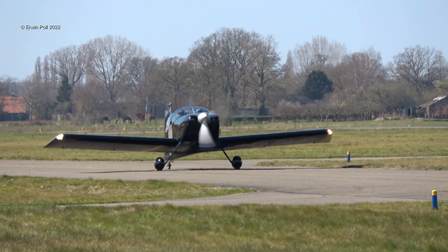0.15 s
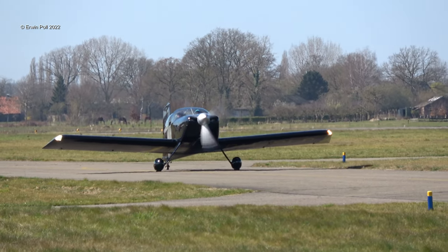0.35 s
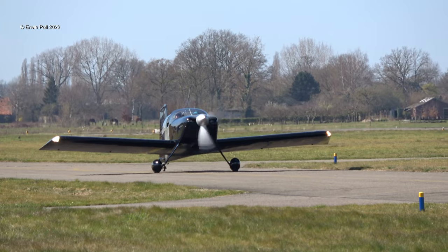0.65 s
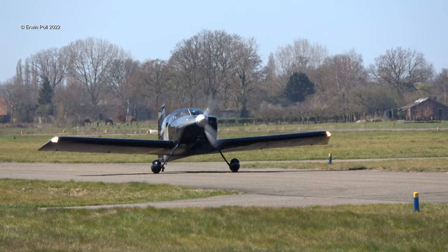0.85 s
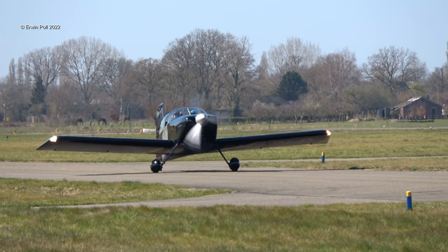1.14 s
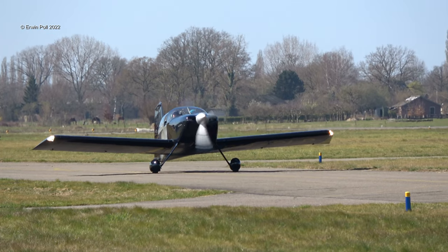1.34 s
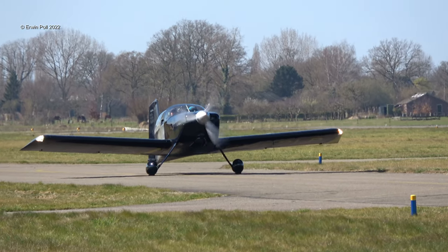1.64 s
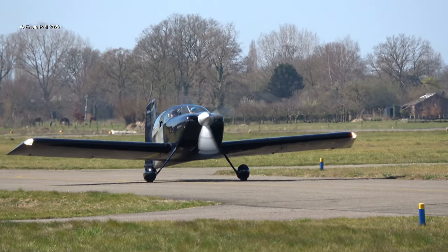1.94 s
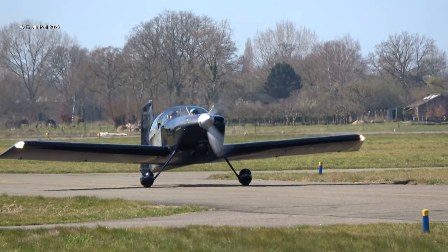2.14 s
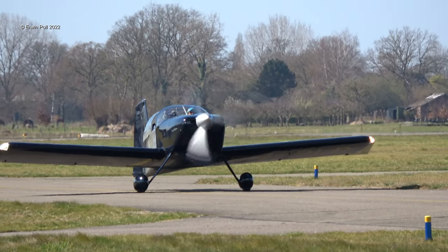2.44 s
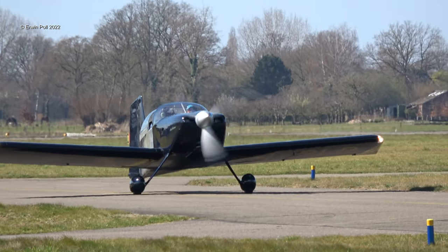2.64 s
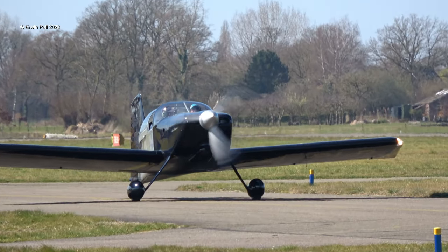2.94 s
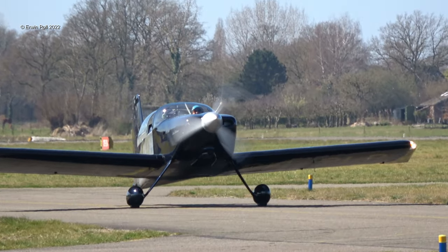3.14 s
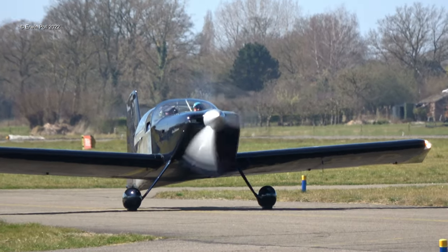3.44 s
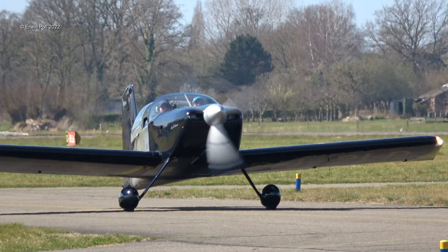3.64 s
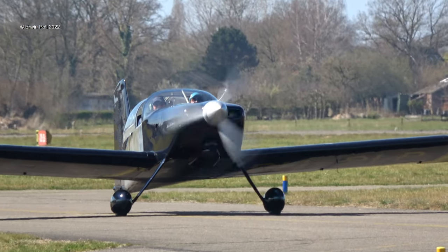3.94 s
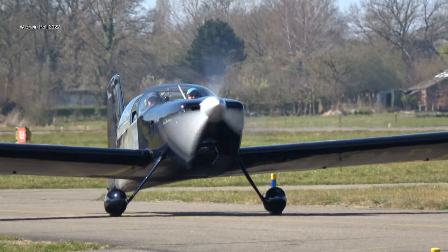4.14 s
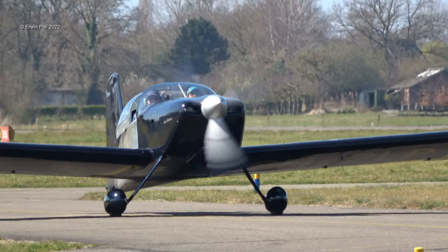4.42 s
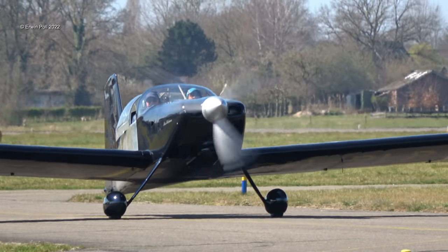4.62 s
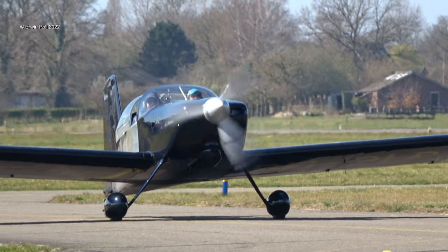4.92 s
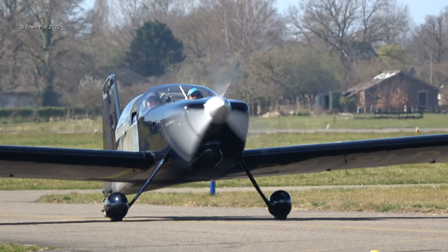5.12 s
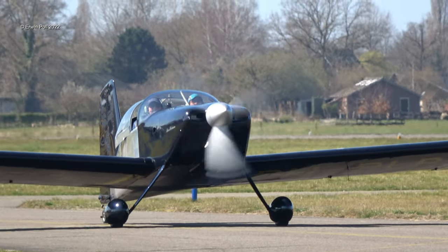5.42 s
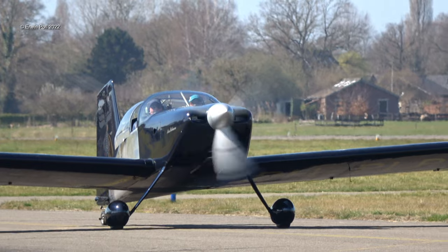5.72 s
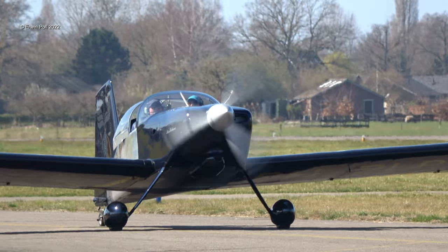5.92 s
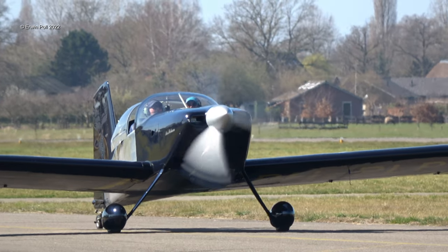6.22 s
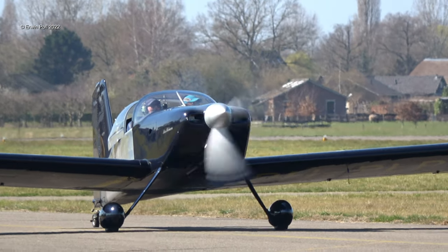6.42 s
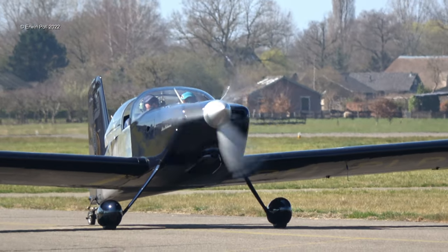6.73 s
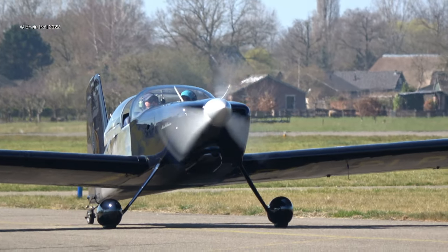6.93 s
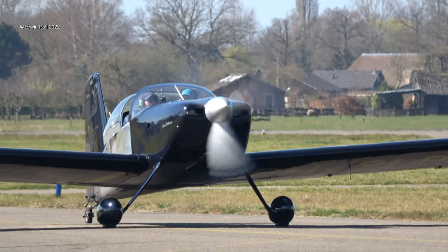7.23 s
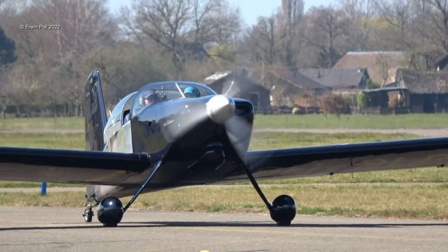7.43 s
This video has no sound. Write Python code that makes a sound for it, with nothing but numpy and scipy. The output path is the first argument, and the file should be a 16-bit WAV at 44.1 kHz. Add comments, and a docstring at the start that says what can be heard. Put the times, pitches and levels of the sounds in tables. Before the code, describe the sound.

Outdoors on a grassy airfield, an idling four-cylinder propeller plane rolls nearer. Its low hum pulses with lumpy firing and metallic rattle, while a faraway engine adds a slowly beating buzz. After about a second something small clicks close to the microphone. The nearer engine then gains body, boom, hiss and sputtering, with brief rough flares and a breathy howl, over mild wind rumble. There is no reverberation.

```python
"""A propeller drones over an exhaust that thuds and spits and a cowling that clatters: a light aircraft,
its four-cylinder engine idling, taxies over open grass toward the microphone from 58.5 m away.
One shaft phase times the drone and the four uneven firings; filtered noise makes gas, air and rattle.
Far off, a faster engine hums and buzzes in overtones that beat with the near exhaust.
A light wind rumbles on the microphone, and something small and hard clicks once close by."""
import sys
import numpy as np
from scipy import signal
from scipy.fft import rfft, irfft, next_fast_len
from scipy.io import wavfile
from scipy.ndimage import uniform_filter1d, minimum_filter1d, map_coordinates

SR = 44100
rng = np.random.default_rng(int(sys.argv[2]) if len(sys.argv) > 2 else 0)


def file_out(sig):
    """Save sig as 16-bit WAV at sys.argv[1]."""
    # one column per channel
    cols = np.atleast_2d(sig).T
    # limit, then scale
    lim = np.clip(cols, -1, 1)
    pcm = np.round(lim * 32767).astype(np.int16)
    wavfile.write(sys.argv[1], SR, pcm)


N = 333837

# The cylinders in firing order. Each row: place in the engine cycle (0-1), thud in dB, spit in dB.
CYLINDER_FIRINGS = [(.135, -2, -4.5), (0.388, -6, -7), (0.649, -8.5, -4), (0.859, 0.5, -20)]
# Steady exhaust tones. Each row: multiple of the engine cycle rate, relative level in dB.
EXHAUST_TONES = [(9, 1), (10, -12), (12, -3.5), (13, 0), (15, -5.5), (16, -6), (17, -14.5), (20, -16),
                 (21, -15), (24, -12.5), (25, -17), (28, -15), (29, -20.5), (37, -28.5), (46, -26.5),
                 (54, -26.5)]
# Colour of the exhaust pipe. Each row: frequency in Hz, gain in dB.
PIPE_COLOUR = [(12, -22), (25, -4), (42, -0.5), (60, -16), (85, 4.5), (115, -1.5), (140, -5), (175, -14),
               (197, -16), (240, -26), (400, -28.5), (700, -33), (2000, -79), (6000, -120)]
# Colour of the valve clatter. Each row: frequency in Hz, relative density in dB per Hz.
CLATTER_COLOUR = [(400, -25.5), (900, -4), (1150, 0), (1450, -1), (1900, -2), (2500, -5.5), (3200, -12),
                  (4200, -21), (6000, -33.5), (10000, -81.5)]
# Colour of the spitting gas. Each row: frequency in Hz, relative density in dB per Hz.
SPIT_COLOUR = [(900, -25), (2000, -2.5), (3300, 5), (4600, 3.5), (6500, -6.5), (8400, -7.5), (10000, -20),
               (11050, -31.5), (11900, -23), (14000, -16), (16000, -27.5)]
# Colour of the wind on the microphone. Each row: frequency in Hz, relative density in dB per Hz.
WIND_SPECTRUM = [(3, -33.5), (7, -4), (10, 8.5), (17, -3), (25, 1.5), (42, -15), (100, -29.5), (300, -63.5),
                 (1000, -120)]
# Ringing cowling panels. Each row: centre in Hz, width in Hz, relative level in dB.
PANEL_RESONANCES = [(1338, 210, -2), (1466, 150, -1.5), (1664, 190, -4.5), (2160, 490, -4.5),
                    (2753, 150, -11.5)]
# The hardest exhaust spits. Each row: start in seconds, approximate peak in dB.
HARD_SPITS = [(1.377, -46), (2.805, -45), (3.613, -44), (3.8536, -40.5), (3.997, -43.5), (4.107, -44.5),
              (4.25, -43), (5.009, -44), (5.267, -55), (5.4835, -49.5), (5.552, -37), (5.697, -42),
              (5.8414, -50), (5.987, -39.5), (6.0242, -46), (6.141, -40.5), (6.277, -44), (6.424, -42.5),
              (6.567, -44), (6.748, -41.5), (6.8927, -35.5), (7.0354, -35.5), (7.144, -43), (7.431, -45),
              (7.468, -41)]
# Speed of the distant engine. Each row: time in seconds, firing rate in Hz.
FAR_FIRING_RATE = [(0, 74.2), (1, 75.26), (2, 74.86), (2.6, 75.78), (3.1, 74.9), (3.6, 74.11), (4.4, 74.63),
                   (5, 75.2), (5.8, 75.02), (6.5, 74.77), (7.57, 74.34)]
# Overtones of the distant engine. Each row: frequency in Hz, relative level in dB.
FAR_OVERTONES = [(150, 12), (226, -3.5), (300, -1), (376, -4), (450, -5), (527, -3.5), (600, -5), (680, -5),
                 (753, -3), (830, -3.5), (905, -5), (980, -9.5), (1150, -17), (1600, -10), (2400, -24),
                 (3000, -22)]
# The click close by. Each row: start in seconds, approximate peak in dB.
CLICK_EVENTS = [(0.8862, -7.5)]
# Ringing of the small hard part. Each row: frequency in Hz, relative level in dB, 60 dB decay in seconds.
CLICK_RINGING = [(560, -8, 0.077), (660, -5, 0.035), (787, -9, 0.059), (947, -7, 0.052), (1180, -24, 0.025),
                 (1450, -14, .025), (1864, -5, 0.02), (2640, -5, 0.017), (2820, -4.5, 0.019),
                 (3440, -14.5, 0.0081), (3850, -17.5, 0.018), (4740, -26.5, 0.017), (5496, -21, 0.014),
                 (6300, -12.5, 0.0088), (6756, -16, 0.015), (7250, -15, 0.0076)]
# Colour of the propeller's wash. Each row: frequency in Hz, relative density in dB per Hz.
WASH_COLOUR = [(120, -20.5), (245, -2), (330, -2), (450, 0), (650, 0), (850, -2.5), (1100, -8.5),
               (1600, -17), (3000, -45.5), (6000, -120)]
# Pitch of the propeller, which hunts and sags with the idling shaft. Each row: time in seconds, drone in Hz.
DRONE_PITCH = [(0.0, 54.36), (0.8, 54.17), (1.2, 55.37), (1.75, 55.19), (2.15, 52.75), (2.55, 56.12),
               (3.1, 55.1), (3.65, 54.84), (4.0, 55.82), (4.7, 55.46), (5.0, 54.21), (5.4, 55.79),
               (5.9, 54.77), (6.3, 55.52), (6.6, 55.2), (7.57, 55.74)]
# How strongly the drone arrives. Each row: time in seconds, level in dB.
DRONE_LEVEL = [(0, -18), (1.1, -16.5), (1.55, -14.5), (2.0, -13.5), (2.15, -15.5), (2.35, -13.5),
               (3.5, -12.5), (4.25, -11), (4.8, -11), (5.5, -9), (6.7, -12), (7.57, -9.5)]
# Level of the howl in the propeller's airflow. Each row: time in seconds, level in dB.
HOWL_STRENGTH = [(0, -51), (1.7, -51), (2.3, -43), (3.35, -43), (3.7, -55), (4.2, -40.5), (4.7, -43.5),
                 (5.5, -38), (6.3, -48.5), (6.9, -44), (7.57, -56)]
# Gusts on the microphone. Each row: centre in seconds, half-length in seconds, level in dB.
WIND_GUSTS = [(3.3, 0.13, -13), (4.15, 0.26, -18), (4.703, 0.26, -16), (5.496, 0.39, -18.5),
              (6.27, 0.11, -9.5)]
# Treble on top of the steady approach. Each row: time in seconds, gain in dB.
TREBLE_GAIN = [(0, -0.5), (1.9, 0), (2.6, 1), (3.4, 2.5), (4.0, 1.05), (4.9, 0.6), (5.55, 1), (6.5, 0),
               (7.57, 0.7)]
# The distant hum. Each row: time in seconds, level in dB before its small random wobble.
HUM_LEVEL = [(0, -17.5), (1, -13.5), (2.05, -23.5), (2.6, -16.5), (3.5, -25.5), (4.6, -15), (6, -30),
             (7.57, -23)]
# Passing swells of single distant overtones. Each row: centre in seconds, half-length in seconds,
# overtone in Hz, gain in dB.
BUZZ_SWELLS = [(.42, .25, 527, 5), (1.45, .42, 678, 6.5), (1.601, 1.1, 452, 6), (1.605, .22, 1055, 13.5),
               (1.917, 0.25, 527, 10.5), (2.796, 0.16, 527, 7), (2.851, 0.27, 603, 9), (3.247, .2, 450, 9),
               (3.1, .35, 980, 6.5), (6.001, 1.2, 375, 11.5)]
# Flares of the roar. Each row: centre in seconds, half-length in seconds, band in Hz, width in Hz,
# level in dB before the flutter.
ROAR_FLARES = [(1.55, 0.32, 1600, 149, -50.5), (2.4, .25, 1390, 160, -43.5), (3.352, .25, 1355, 220, -47),
               (4.15, .25, 1670, 90, -48), (4.816, .16, 1700, 150, -46), (5.503, 0.28, 1383, 280, -40),
               (6.154, 0.23, 1393, 180, -40), (7.45, .4, 2130, 790, -41.5)]

# The aircraft rolls straight in at a steady pace.
START_M, TAXI_M_PER_S = 58.5, 3.97
# Levels at the starting distance, before the treble curve; each gains as the aircraft nears.
CLATTER_DB, SPIT_DB, PANELS_DB = -44, -59, -54
# Grass and air swallow this much spitting treble over each metre.
SPIT_LOSS_DB_PER_M = 0.12
# Exhaust and wash at the drone's mean level, and the share of its dB swings that they follow.
THUD_DB, THUD_FOLLOWS = -26.5, 0.81
WASH_DB, WASH_FOLLOWS = -37, 0.22
# The low end of the wash fills out by this share of the dB gained in nearing.
WASH_LOW_HZ, WASH_FILL = 340, 0.91
# The howl climbs once and stays up.
HOWL_LOW_HZ, HOWL_HIGH_HZ, HOWL_CLIMBS_S, HOWL_CLIMB_S = 837, 929.6, 2.65, .2
# Engine bay boom against the drone; it opens only once the nose has come round.
BOOM_DB, BOOM_OPENS_S, BOOM_OPENING_S, BOOM_SHUT_DB = -37.5, 1.4, 0.85, -12.5
# The exhaust throb lies close in pitch to the distant hum; the two oppose each other at CANCEL_S.
THROB_ORDER, CANCEL_S = 11, 4.08
# Throb at idle speed and mean drone level; it grows as the labouring shaft sags.
THROB_DB, IDLE_HZ, THROB_DB_PER_HZ = -18.5, 54.7, 5
# The distant buzz swells in to BUZZ_DB, holds, then fades to a lower level.
BUZZ_DB, BUZZ_SWELLS_S, BUZZ_SWELLING_S, BUZZ_SWELL_DB = -33.5, 0.53, 0.13, 3.5
BUZZ_FADES_S, BUZZ_FADING_S, BUZZ_FADE_DB = 3.94, 0.5, -7
# The overtones that carry best drift upward and come to rest.
FOCUS_START_HZ, FOCUS_RISE_HZ_PER_S, FOCUS_END_HZ = 487, 150, 1010
BREEZE_DB = -27.5
TOP_HZ = 15750


def amp(db):
    """Decibels to gain."""
    return 10 ** (np.asarray(db) / 20)


def unit(x):
    """Scale to rms 1."""
    return x / np.sqrt(np.mean(x ** 2) + 1e-20)


def along(points, hz):
    """Read (Hz, value) points on a log frequency axis."""
    f, v = np.transpose(points)
    return np.interp(np.log(hz + 1), np.log(f + 1), v)


def curve(rows):
    """One value per sample from (seconds, value) rows."""
    s, values = np.transpose(rows)
    return np.interp(np.arange(N) / SR, s, values)


def wobble(rate):
    """A smooth random curve with rate knots a second."""
    return map_coordinates(rng.standard_normal(2048), [np.arange(N) * rate / SR + 2], mode="mirror")


def step(at_s, width_s):
    """A smooth change from 0 to 1 around a moment."""
    return .5 + .5 * np.tanh((np.arange(N) / SR - at_s) / (2 * width_s))


def swell(at_s, half_s):
    """A smooth rise to 1 and fall around a moment."""
    return np.exp(-((np.arange(N) / SR - at_s) / half_s) ** 2)


def filtered(x, response):
    """Multiply the spectrum of x by a response of frequency."""
    m = next_fast_len(N + SR // 2)
    return irfft(rfft(x, m) * response(np.fft.rfftfreq(m, 1 / SR)), m)[:N]


def noise(spectrum):
    """Coloured noise of rms 1."""
    return unit(filtered(rng.standard_normal(N), lambda hz: amp(along(spectrum, hz))))


def causal(spectrum, hz):
    """The minimum-phase response with this colour: it rings only after a blow."""
    cepstrum = irfft(np.log(amp(along(spectrum, hz))))
    half = len(cepstrum) // 2
    cepstrum[1:half] *= 2
    cepstrum[half + 1:] = 0
    return np.exp(rfft(cepstrum))


def resonant(centre_hz, width_hz):
    """Noise of rms 1 ringing in one resonance."""
    def response(f):
        peak = 1j * f * width_hz / (centre_hz ** 2 - f * f + 1j * f * width_hz)
        return peak ** 2
    return unit(filtered(rng.standard_normal(N), response))


def impulses(times, sizes):
    """A train of single blows."""
    samples = np.clip(np.round(times * SR).astype(int), 0, N)
    return np.bincount(samples, sizes, N + 1)[:N]


def puffs(blows, rise, t60):
    """Each blow opens a quick swell that dies away (both times in seconds)."""
    t = np.arange(SR // 4) / SR
    shape = (1 - np.exp(-t / rise)) * amp(-60 * t / t60)
    return signal.fftconvolve(blows, shape / shape.max())[:N]


def patchy(x, depth_db, across_hz, lasting_s):
    """Turbulence: short patches of the sound stand out or sink, each in its own band."""
    z = signal.stft(x, nperseg=256)[2]
    bands, frames = np.indices(z.shape)
    at = [bands * SR / 256 / across_hz, frames * 128 / SR / lasting_s]
    field = map_coordinates(rng.standard_normal((96, 1024)), at, order=1, mode="mirror")
    patches_db = depth_db * unit(np.tanh(2 * field))
    return unit(signal.istft(z * amp(patches_db), nperseg=256)[1][:N])


def engine_cycle():
    """Engine cycles done so far: the drone swings eight times in each."""
    return np.cumsum(curve(DRONE_PITCH)) / SR / 8


def approach():
    """Metres rolled so far, and the dB gained by being nearer (inverse distance)."""
    rolled_m = TAXI_M_PER_S * np.arange(N) / SR
    return rolled_m, 20 * np.log10(START_M / np.maximum(START_M - rolled_m, 1))


def propeller(cycle, drone_db, swell_db, near_db):
    """The blades beat the air into a pure drone, over churned wash and a howl."""
    drone = amp(drone_db) * np.sin(2 * np.pi * 8 * cycle)
    return drone + amp(WASH_DB + WASH_FOLLOWS * swell_db) * wash(near_db) + howl(width_hz=75)


def wash(near_db):
    """Air churned by the blades, fuller from near by."""
    air = noise(WASH_COLOUR)
    low = filtered(air, lambda hz: 1 / (1 + (hz / WASH_LOW_HZ) ** 8))
    fill = amp(WASH_FILL * (near_db - near_db.mean()))
    return (air - low + low * fill) * amp(0.47 * wobble(16))


def howl(width_hz):
    """A narrow, breathy noise band in the airflow that climbs in pitch, coming and going."""
    def band():
        return filtered(rng.standard_normal(N), lambda f: 1 / (1 + (f / width_hz) ** 2))
    hz = HOWL_LOW_HZ + (HOWL_HIGH_HZ - HOWL_LOW_HZ) * step(HOWL_CLIMBS_S, HOWL_CLIMB_S)
    phase = 2 * np.pi * np.cumsum(hz) / SR
    breath = unit(band() * np.cos(phase) + band() * np.sin(phase))
    return amp(curve(HOWL_STRENGTH)) * breath


def firings(cycle, jitter_s, thud_scatter_db, spit_scatter_db):
    """Thud and spit blows: four unequal firings a cycle, none burning quite like the last."""
    chance = rng.standard_normal((60, 4, 3))  # cycles, cylinders, (timing, thud, spit)
    place, thud_db, spit_db = np.transpose(CYLINDER_FIRINGS)
    turns = np.arange(len(chance))[:, None] + place
    times = np.interp(turns, cycle, np.arange(N) / SR, right=N) + jitter_s * chance[..., 0]
    thud = amp(thud_db + thud_scatter_db * chance[..., 1])
    spit = amp(spit_db + spit_scatter_db * chance[..., 2])
    return impulses(times.ravel(), thud.ravel()), impulses(times.ravel(), spit.ravel())


def exhaust(cycle, thuds):
    """Firings thump through the pipe; their repeating pattern holds a few low tones."""
    def tone(order):
        phase = 2 * np.pi * (order * cycle + rng.random()) + .2 * wobble(4)
        return amp(1.5 * wobble(3)) * np.sin(phase)
    thump = unit(filtered(thuds, lambda hz: causal(PIPE_COLOUR, hz)))
    gas = unit(noise(PIPE_COLOUR) * (0.16 + puffs(thuds, rise=0.0026, t60=0.078)))
    tones = sum(amp(db) * tone(order) for order, db in EXHAUST_TONES)
    return amp(-3.5) * thump + amp(-3) * gas + tones


def throb(cycle, drone_hz, swell_db):
    """The exhaust's strongest tone, louder as the labouring shaft sags below its idle."""
    db = THROB_DB + THROB_DB_PER_HZ * (IDLE_HZ - drone_hz) + 0.55 * swell_db
    return amp(db) * np.sin(2 * np.pi * THROB_ORDER * cycle)


def spitting(spits):
    """Gas puffs out at each opening exhaust valve in shifting patches of colour, over a steady hiss."""
    sparks = (rng.random(N) < 3500 / SR) * rng.standard_normal(N)  # about 3500 a second
    crackle = unit(filtered(sparks, lambda hz: causal(SPIT_COLOUR, hz)))
    gas = noise(SPIT_COLOUR) + amp(-7) * crackle
    flecked = patchy(gas, depth_db=4, across_hz=480, lasting_s=.018)
    bursts = unit(flecked * puffs(spits, rise=0.0026, t60=.11))
    return amp(-3.5) * bursts + amp(-2.5) * noise(SPIT_COLOUR)


def clatter(thuds):
    """Valve gear rattles, a little harder at each firing."""
    ticks = (rng.random(N) < 900 / SR) * rng.standard_normal(N)  # about 900 a second
    rattle = unit(filtered(ticks, lambda hz: causal(CLATTER_COLOUR, hz)))
    pulsing = unit(1 + 0.3 * puffs(thuds, rise=0.0016, t60=0.016)) * amp(0.59 * wobble(45))
    rush = patchy(noise(CLATTER_COLOUR), depth_db=2.5, across_hz=280, lasting_s=.016)
    return pulsing * (amp(-0.96) * rush + amp(-7.5) * rattle)


def cowling(drone_db, near_db):
    """The engine bay booms with the drone and its panels ring, each swelling on its own."""
    boom_db = drone_db + BOOM_DB + BOOM_SHUT_DB * (1 - step(BOOM_OPENS_S, BOOM_OPENING_S))
    boom = amp(boom_db) * resonant(centre_hz=381.5, width_hz=53)
    panels = sum(amp(db + 2.5 * wobble(5)) * resonant(hz, width) for hz, width, db in PANEL_RESONANCES)
    return boom + amp(PANELS_DB + near_db) * unit(panels)


def distant_engine(cycle):
    """A far-off firing tone beats against the near exhaust, under a buzz of its overtones."""
    firing_hz = curve(FAR_FIRING_RATE)
    turns = np.cumsum(firing_hz) / SR
    lead = (turns - THROB_ORDER * cycle)[round(CANCEL_S * SR)]
    phase = 2 * np.pi * (turns - lead + .5)  # half a turn from the throb at CANCEL_S
    hum = amp(curve(HUM_LEVEL) + 0.41 * wobble(4.2)) * np.sin(phase + 0.082 * wobble(5.3))
    swell_db = BUZZ_SWELL_DB * (step(BUZZ_SWELLS_S, BUZZ_SWELLING_S) - 1)
    fade_db = BUZZ_FADE_DB * step(BUZZ_FADES_S, BUZZ_FADING_S)
    return hum + amp(BUZZ_DB + swell_db + fade_db) * distant_buzz(firing_hz, phase)


def distant_buzz(firing_hz, phase):
    """Overtones 2 to 25 of the distant engine swell and fade one by one in moving air."""
    focus_hz = np.minimum(FOCUS_START_HZ + FOCUS_RISE_HZ_PER_S * np.arange(N) / SR, FOCUS_END_HZ)
    buzz = np.zeros(N)
    for k in range(2, 26):
        hz = k * firing_hz.mean()
        focus_db = 6 / (1 + ((hz - focus_hz) / 50) ** 2)
        level_db = along(FAR_OVERTONES, hz) + focus_db + 1.5 * wobble(5)
        for s, half_s, at_hz, db in BUZZ_SWELLS:
            if abs(hz - at_hz) < firing_hz[0] / 2:  # the overtone nearest to this swell
                level_db = level_db + db * swell(s, half_s)
        buzz += amp(level_db) * np.cos(k * phase + 0.07 * k * wobble(5) + .7 * wobble(1))
    return unit(buzz)


def wind():
    """A light breeze rumbles on the microphone as low noise, with a few gusts."""
    gusts = sum(amp(db) * swell(s, half_s) for s, half_s, db in WIND_GUSTS)
    breeze = amp(BREEZE_DB + 1.8 * wobble(1.7))
    return np.hypot(breeze, gusts) * noise(WIND_SPECTRUM)


def click():
    """A small hard part snaps close to the microphone: a noise crack and a brief ring of modes."""
    t = np.arange(SR // 8) / SR
    ring = sum(amp(db - 60 * t / t60) * np.sin(2 * np.pi * (hz * t + rng.random()))
               for hz, db, t60 in CLICK_RINGING)
    crack = amp(-17.0 - 60 * t / 0.014) * rng.standard_normal(len(t))
    snap = (ring + crack) * (1 - np.exp(-t / 0.0002))
    s, db = np.transpose(CLICK_EVENTS)
    return signal.fftconvolve(impulses(s, amp(db - 8.0)), snap)[:N]  # 8 dB: allowance for the snap's peak


def hard_spits():
    """Now and then a harder spit: a puff of patchy gas noise."""
    s, db = np.transpose(HARD_SPITS)
    gas = patchy(noise(SPIT_COLOUR), depth_db=4, across_hz=520, lasting_s=.02)
    strengths = impulses(s, amp(db - 6.5))  # 6.5 dB: allowance for noise peaks above rms
    return gas * puffs(strengths, rise=0.006, t60=0.065)


def roars():
    """Now and then one band of the roar flares up, rough and fluttering."""
    flares = sum(amp(db) * swell(s, half_s) * resonant(hz, width)
                 for s, half_s, hz, width, db in ROAR_FLARES)
    return flares * amp(1.2 * wobble(50) - 1)


def aircraft(cycle):
    """One shaft drives propeller and engine; the bass swells with the drone, the treble with nearness."""
    drone_db = curve(DRONE_LEVEL)
    swell_db = drone_db - drone_db.mean()
    rolled_m, near_db = approach()
    treble_db = near_db + curve(TREBLE_GAIN)
    thuds, spits = firings(cycle, jitter_s=0.0005, thud_scatter_db=2.1, spit_scatter_db=2.3)
    blades = propeller(cycle, drone_db, swell_db, near_db)
    pipe = amp(THUD_DB + THUD_FOLLOWS * swell_db) * exhaust(cycle, thuds)
    pipe = pipe + throb(cycle, curve(DRONE_PITCH), swell_db)
    valves = amp(CLATTER_DB + treble_db) * clatter(thuds)
    # the loss over each metre is regained as that metre is rolled
    gas = amp(SPIT_DB + treble_db + SPIT_LOSS_DB_PER_M * rolled_m) * spitting(spits)
    return blades + pipe + valves + gas + hard_spits() + roars() + cowling(drone_db, treble_db)


def scene():
    """Open grass, no echoes: the aircraft, the engine far off, the wind and the click."""
    cycle = engine_cycle()
    return (aircraft(cycle) + distant_engine(cycle) + wind() + click())[None]


def record(dry):
    """A limiter eases the biggest swings over 40 ms, and nothing is kept above the band limit."""
    needed = np.minimum(1, .94 / (np.abs(dry[0]) + 1e-9))
    gain = uniform_filter1d(minimum_filter1d(needed, size=SR // 25), size=SR // 25)
    return filtered(dry[0] * gain, lambda hz: hz < TOP_HZ)[None]


dry = scene()
out = record(dry)
file_out(out)
```